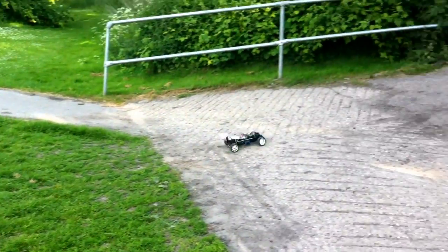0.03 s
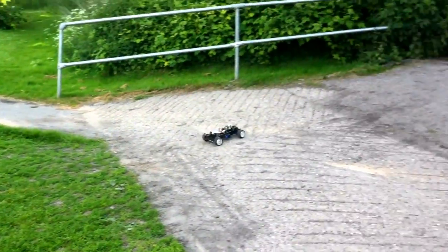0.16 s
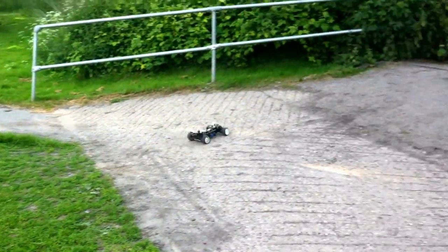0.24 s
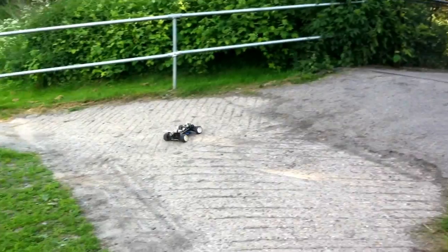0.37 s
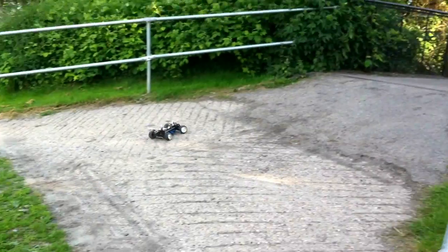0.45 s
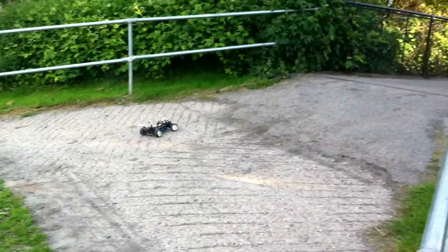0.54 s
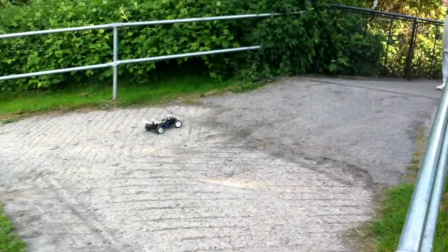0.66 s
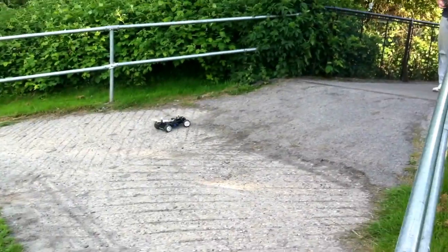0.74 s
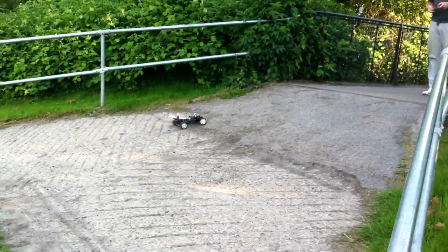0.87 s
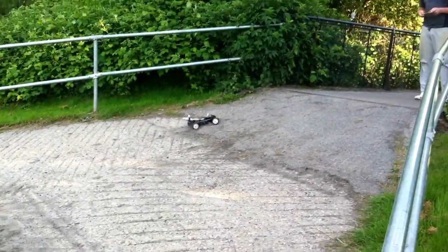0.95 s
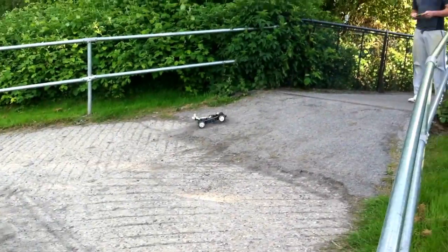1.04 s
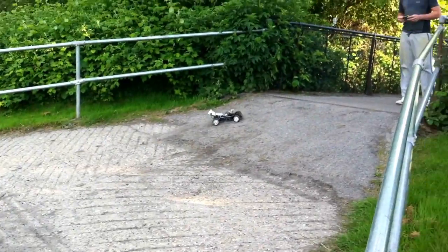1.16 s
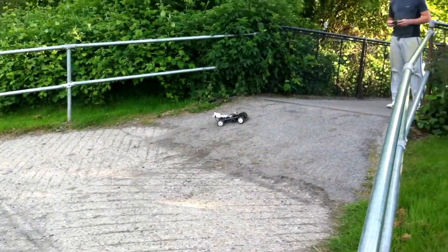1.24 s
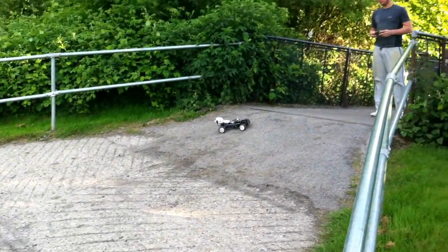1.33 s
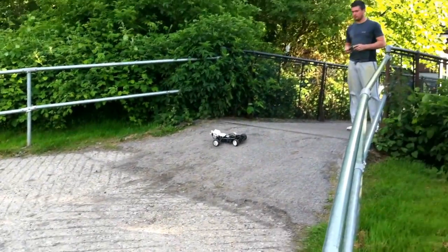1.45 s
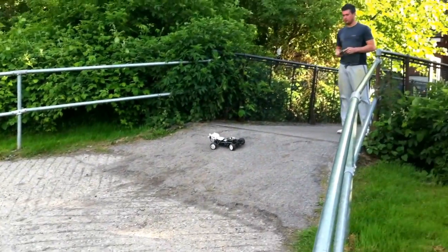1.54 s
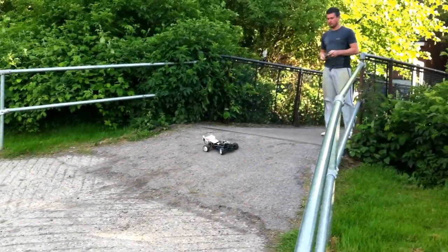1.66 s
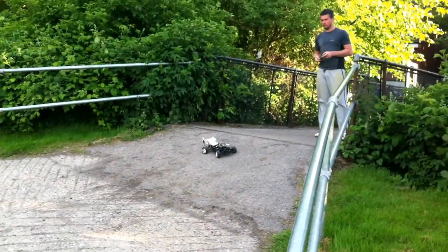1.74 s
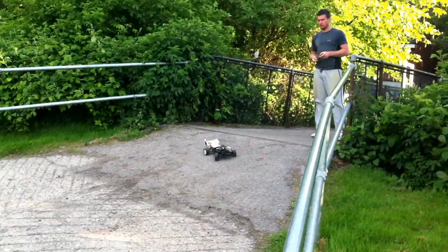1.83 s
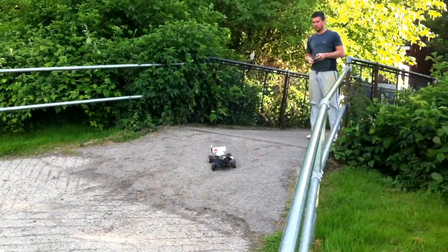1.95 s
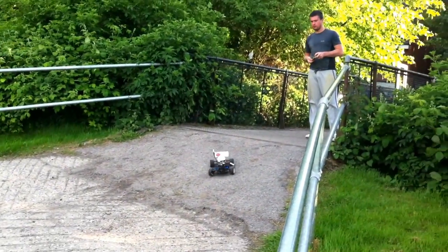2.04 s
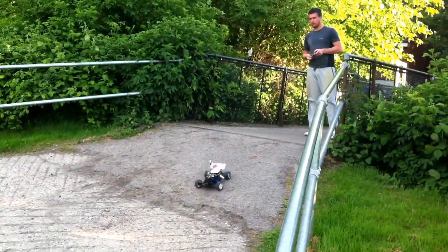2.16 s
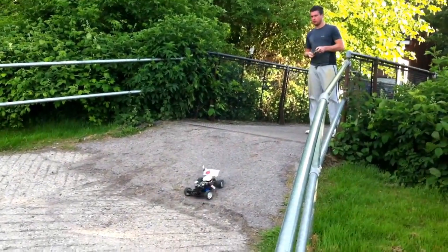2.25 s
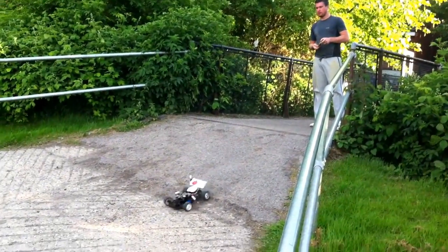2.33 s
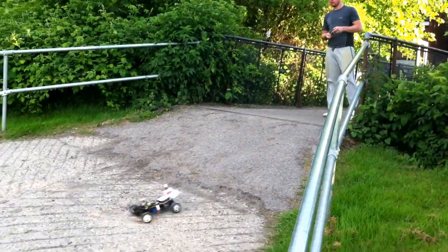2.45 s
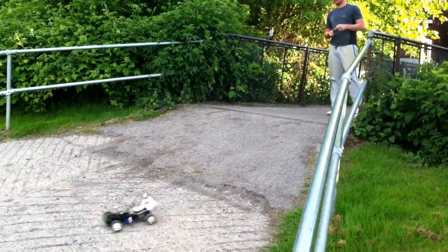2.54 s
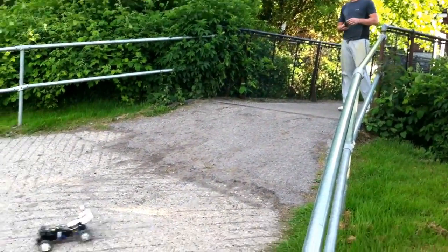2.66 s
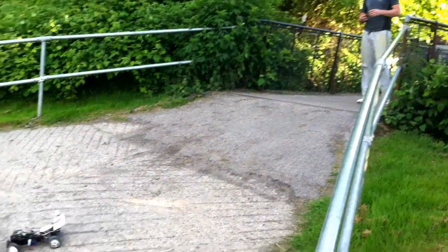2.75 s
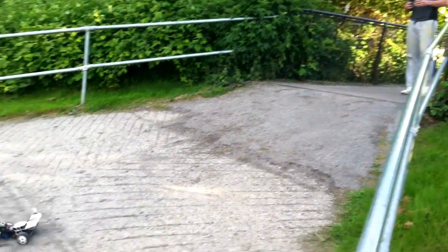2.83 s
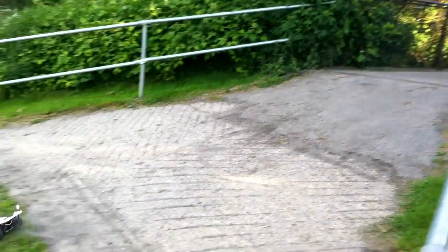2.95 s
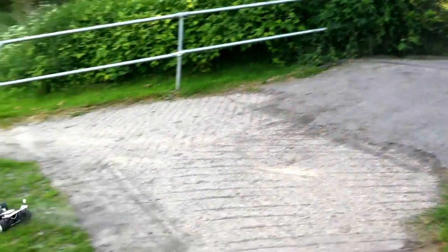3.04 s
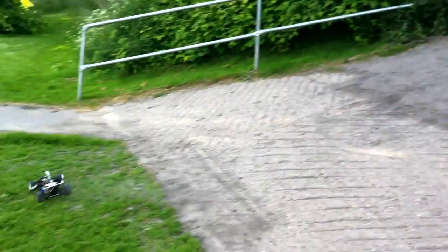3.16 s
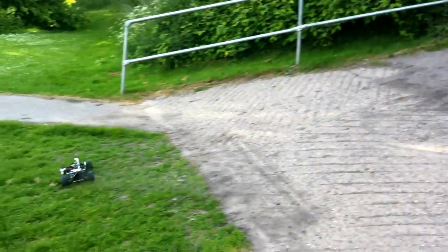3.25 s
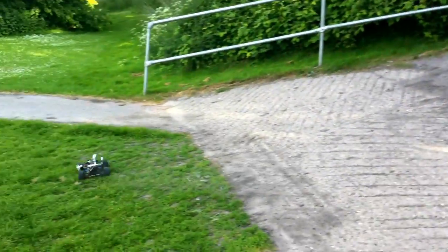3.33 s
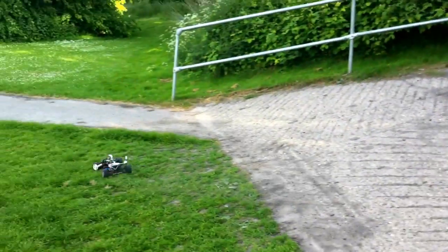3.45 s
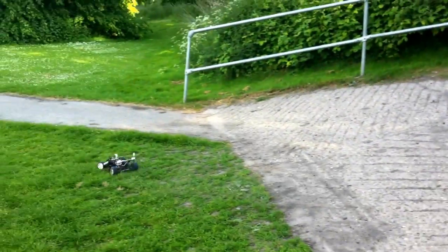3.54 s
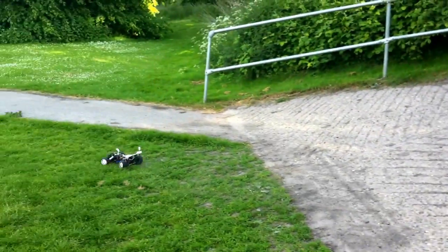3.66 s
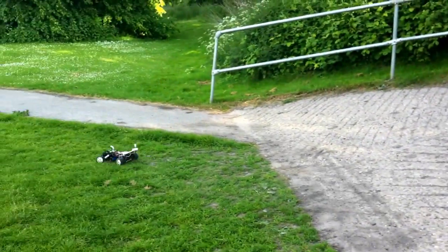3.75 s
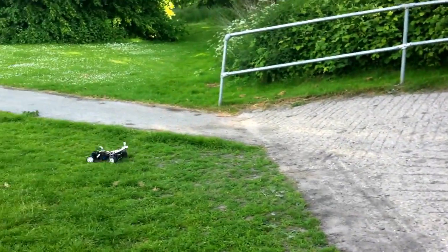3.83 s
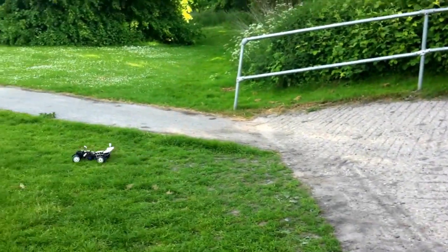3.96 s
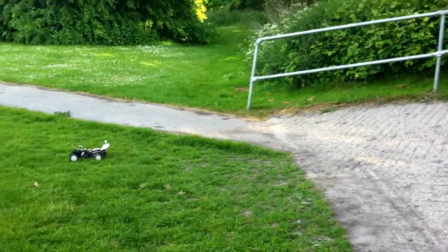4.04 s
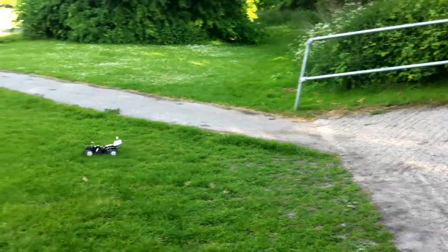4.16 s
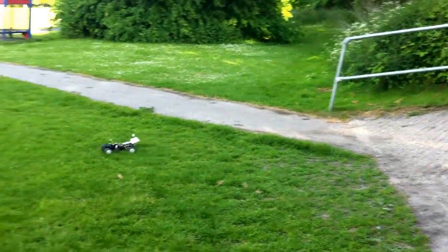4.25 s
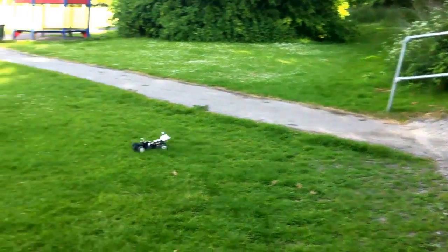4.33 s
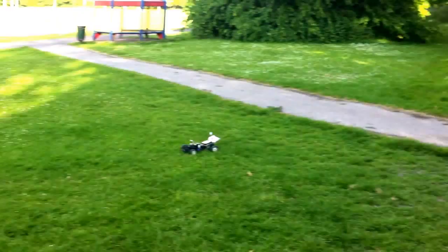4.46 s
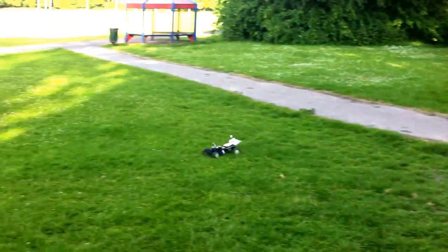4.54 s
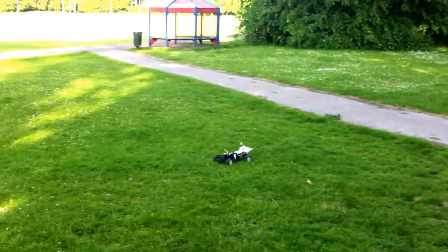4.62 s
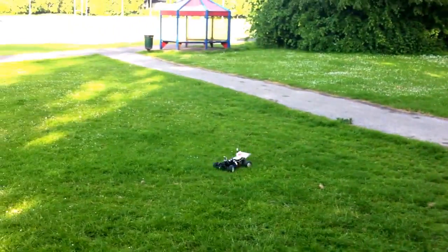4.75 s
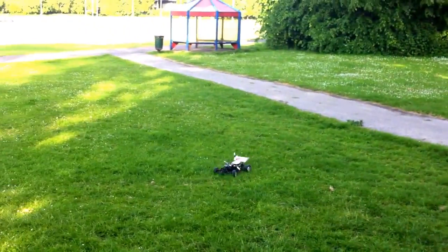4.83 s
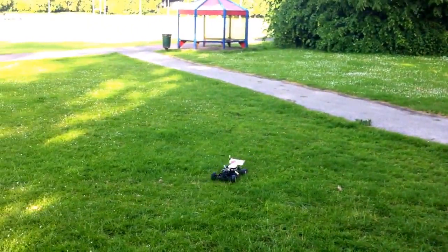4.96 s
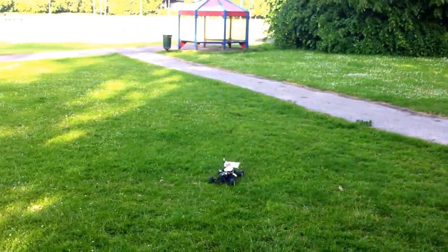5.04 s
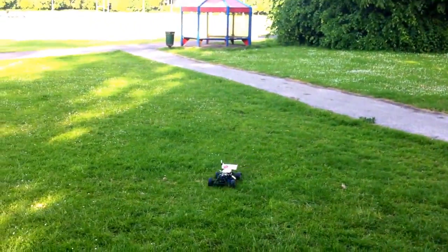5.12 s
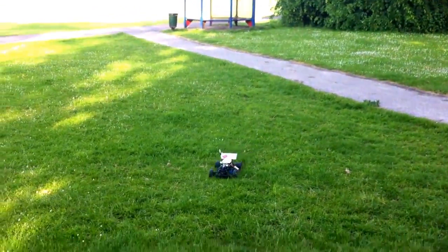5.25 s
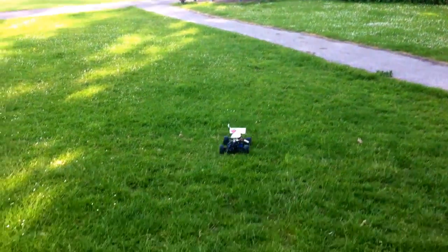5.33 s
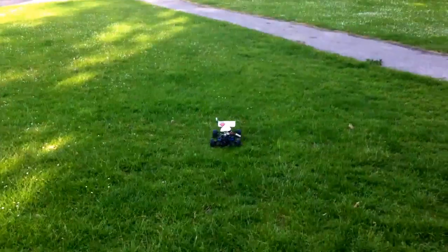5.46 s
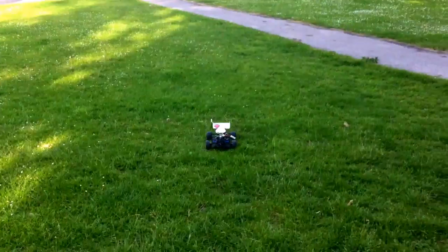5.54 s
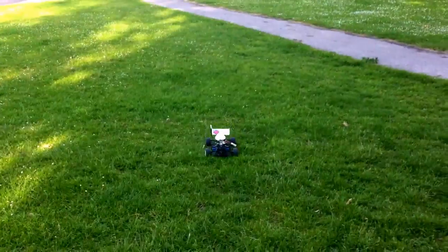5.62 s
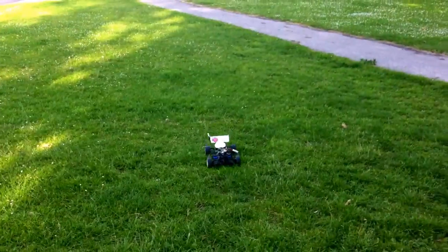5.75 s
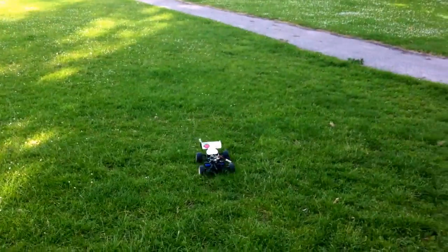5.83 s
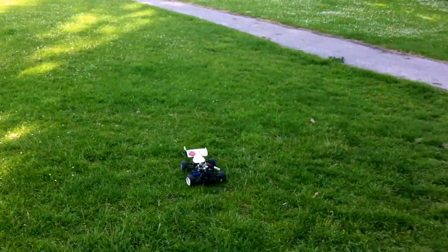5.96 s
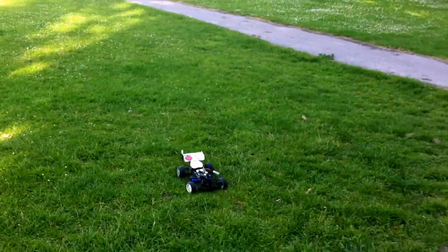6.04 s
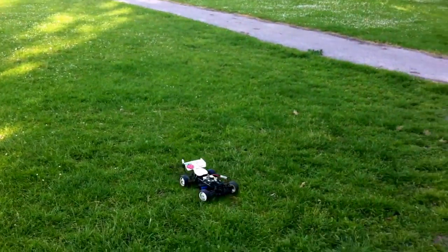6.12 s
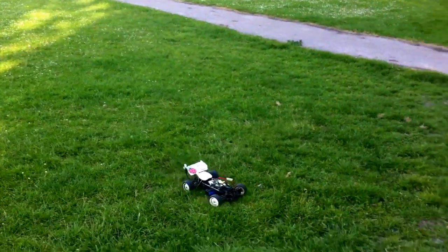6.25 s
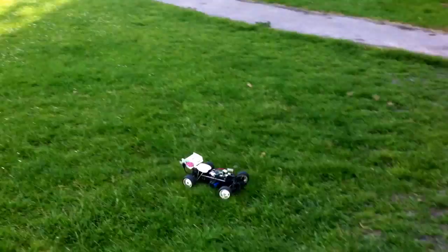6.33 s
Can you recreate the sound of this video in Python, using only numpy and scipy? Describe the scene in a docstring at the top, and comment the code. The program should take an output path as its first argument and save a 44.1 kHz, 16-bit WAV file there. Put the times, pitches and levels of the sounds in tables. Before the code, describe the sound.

Outdoors in a park, a small electric toy buggy whines with raspy plastic gears, climbing in pitch over paving, dropping as it coasts and turns, then surging to a shrill pass close by. It clatters onto grass, slackens, revs again with two soft knocks, and settles into a low labouring buzz. A handheld microphone a few metres away catches faint park hum and late wind thumps.

```python
"""The whine and rasp of a radio-controlled toy buggy come first, rising and falling with motor speed.
It darts over paving, turns, races past and labours away through grass; gears are phase-summed tones and noise.
Slack gears chirp while it coasts, tyres scrub, the chassis hops and knocks, gears clash and grit flicks the shell.
Knocks are decaying modes, the rest of the impacts shaped noise; the ground reflects them only for drive and tyres.
Low hum and outdoor rush, tones and filtered noise, lie below; wind buffets the microphone, most near the end."""
import sys
import numpy as np
from scipy import signal
from scipy.fft import rfft, irfft, next_fast_len
from scipy.io import wavfile
from scipy.ndimage import uniform_filter1d, map_coordinates

SR = 44100
rng = np.random.default_rng(int(sys.argv[2]) if len(sys.argv) > 2 else 0)


def transcribe(signal):
    """Save signal, clipped to [-1, 1], as a 16-bit WAV file at the path in sys.argv[1]."""
    frames = np.atleast_2d(signal).T
    limited = np.clip(frames, -1, 1)
    pcm = np.round(limited * 32767).astype(np.int16)
    wavfile.write(sys.argv[1], SR, pcm)


N = 281799

# Motor speed before slip. Each row: time in seconds, rate of tooth meshing in Hz.
TOOTH_RATE = [(0.0, 1410), (0.18, 1391), (0.24, 1200), (0.28, 1310), (0.38, 1159), (0.45, 1150),
              (0.5, 1290), (0.57, 1312), (0.65, 1984), (0.75, 2107), (0.8, 2215), (0.84, 2170), (0.9, 2365),
              (0.925, 2200), (1.01, 2520), (1.08, 2386), (1.13, 2580), (1.18, 2170), (1.24, 2208),
              (1.31, 3120), (1.36, 3104), (1.385, 2193), (1.43, 1560), (1.47, 1440), (1.56, 1146),
              (1.69, 1217), (1.81, 1114), (1.85, 1229), (1.9, 1110), (1.99, 1120), (2.07, 1640),
              (2.1, 1520), (2.125, 1806), (2.16, 1960), (2.25, 2280), (2.38, 2570), (2.44, 2396),
              (2.49, 2969), (2.53, 2685), (2.59, 2820), (2.68, 3060), (2.76, 2990), (2.85, 3150),
              (2.92, 3820), (2.97, 3195), (3.01, 2240), (3.13, 1772), (3.4, 1100), (3.54, 1318),
              (3.68, 1276), (3.77, 1670), (3.83, 2076), (3.91, 1698), (4.01, 2600), (4.06, 2236),
              (4.11, 2168), (4.15, 2396), (4.21, 2480), (4.26, 2336), (4.43, 2600), (4.465, 2350),
              (4.48, 2030), (4.507, 2000), (4.52, 1550), (4.57, 1300), (4.66, 1390), (4.73, 1320),
              (4.78, 1447), (4.84, 1298), (4.96, 1195), (5.04, 1365), (5.07, 1148), (5.32, 1023),
              (5.39, 1076), (5.48, 969), (5.58, 1192), (5.66, 1109), (5.77, 1221), (5.86, 1215),
              (5.94, 1421), (6.0, 1391), (6.1, 1640), (6.18, 1662), (6.26, 1293), (6.39, 1663)]
VERGE_S = 0.048  # softness in seconds of the edges of lawn and bumpy stretches


def amp(db):
    """Level law: decibels to an amplitude ratio."""
    return 10 ** (np.asarray(db) / 20)


def unit(x):
    """Normalisation of power: scale to rms 1."""
    return x / np.sqrt(np.mean(x ** 2) + 1e-20)


def along(points, hz):
    """Interpolation of (Hz, value) points on a logarithmic frequency axis."""
    f, v = np.transpose(points)
    return np.interp(np.log(hz + 1), np.log(f + 1), v)


def curves(rows):
    """Linear interpolation in time: one value per sample for each column after the time."""
    s, *cols = np.transpose(rows)
    return [np.interp(np.arange(N) / SR, s, c) for c in cols]


def gate(start, end, edge_s):
    """Smooth switching: 1 between two times and 0 outside, with soft edges."""
    t = np.arange(N) / SR
    return .5 * (np.tanh((t - start) / edge_s) - np.tanh((t - end) / edge_s))


def wobble(rate):
    """Band-limited random modulation: a smooth curve through rate random knots a second."""
    knots = rng.standard_normal(16384)
    return map_coordinates(knots, [np.arange(N) * rate / SR], mode="wrap")


def filtered(x, response):
    """Linear filtering: multiply the spectrum of x by a response of frequency."""
    m = next_fast_len(N + SR // 2)
    return irfft(rfft(x, m) * response(np.fft.rfftfreq(m, 1 / SR)), m)[:N]


def coloured(x, spectrum):
    """Spectral shaping: x through a (Hz, dB) response, at rms 1."""
    return unit(filtered(x, lambda hz: amp(along(spectrum, hz))))


def grit(spectrum, spiky_db):
    """Superposition of dense tiny impacts: noise of uneven strength, coloured, at rms 1."""
    impacts = rng.standard_normal(N) * amp(spiky_db * wobble(1500))
    return coloured(impacts, spectrum)


def drivetrain():
    """Gear meshing gives tones at multiples of the tooth rate, with rasp and sizzle; slip and load modulate them."""
    # Level laws: base dB at cruise and reference distance, dB per doubling of speed, dB coasting,
    # dB on grass, dB on the gear side, dB accelerating hard. Swells and offsets are added later.
    whine_law, octave_law, buzz_law = (-42.5, 7.5, -15.5, -1.5, 2, 0), (-37, 5.5, -13, -1.5, 1, -1.5), (-38, 7, -11.5, -0.5, 2.5, 3.5)
    rasp_law, sizzle_law = (-42.5, 8, -14.5, -4, 0.5, 0.5), (-41, 13, -8.5, 0.5, -5, 3.5)
    # Slow swells about the laws. Each row: time in seconds, tooth rasp in dB, motor sizzle in dB.
    noise_swells = [(0, 1, -15), (.75, -1.5, 0), (1.3, -1, -15), (1.5, 4.5, -9), (1.58, 11, -4),
                    (1.64, 4.5, -8), (1.75, 1, -7), (1.81, 6, -5), (1.86, 0, -7), (1.95, 2, -6),
                    (2.5, 1.5, -2), (2.8, -1, -1), (2.9, -10, -4), (2.96, -22, -5), (3.03, -15, -4),
                    (3.2, -12, 3), (3.4, 0, 5), (3.55, -1.5, 6), (3.82, 3, 3), (4.12, -3.5, 5.5),
                    (4.28, -7, -1.5), (4.5, 2.5, 1.5), (4.56, 1.5, 2), (4.7, 7.5, 1), (5.1, 4.5, -3.5),
                    (5.7, -1.5, -10), (5.95, 2.5, -6), (6.39, 5, 4.5)]
    # Slow swells about the laws. Each row: time in seconds, tooth tone in dB, overtones in dB.
    tone_swells = [(0, 5.5, -4), (.22, 2, -3), (.29, 4.5, 1), (.42, 2.5, -1.5), (.58, -1.5, -8),
                   (.615, 12, 0), (.645, 1, 3), (.72, 4, -1.5), (.9, 2, 2), (1.05, 2.5, 1.5),
                   (1.15, 2.5, -3.5), (1.21, 3, -9), (1.28, -0.5, -12), (1.4, 0, -5), (1.435, 12, -6),
                   (1.47, 8, -3), (1.6, -13, -2), (1.87, -9, -14), (1.92, 1, -3.5), (1.99, 7.5, -0.5),
                   (2.04, 5, -7), (2.08, 11.5, -5), (2.13, 10, -3), (2.17, 3.5, -2), (2.35, 3, 0.5),
                   (2.55, 2, -2.5), (2.77, 2.5, -2), (2.85, 3.5, -2), (2.91, -8, -20), (2.99, -12, -22),
                   (3.15, -0.5, -8), (3.3, 0, -12), (3.43, 9, -2), (3.49, 0.5, -3), (3.62, 4, -2),
                   (3.8, -0.5, -2), (4.0, 1, 2.5), (4.12, -3, 1), (4.3, -4.5, -4.5), (4.42, -3, -1.5),
                   (4.48, 2, 1), (4.51, 5, -3), (4.535, -17, -8), (4.565, 7, -8), (4.6, -2, -7),
                   (4.7, 5, 0), (4.88, 2, -1.5), (5.02, 3, -2.5), (5.35, -8, 1), (5.6, -2, -2.5),
                   (5.85, -8.5, -3.5), (5.95, 6, -4.5), (6.39, 3, -5)]
    # Radiation of the octave by the housing. Each row: frequency in Hz, gain in dB.
    housing = [(2000, -9), (2350, -7), (2800, -13.5), (3300, -8.5), (3750, -5.5), (4200, -2), (4800, 1),
               (5500, -5), (7000, -3)]
    # Escape of the higher overtones from the housing. Each row: frequency in Hz, gain in dB.
    overtone_path = [(2900, 0), (3450, -4), (4000, 0), (4700, 0), (5400, -10), (7500, -13), (9300, -3),
                     (11000, -20)]
    # Noise spectra, relative. Each row: frequency in Hz, level in dB per Hz.
    rasp_spectrum, sizzle_spectrum = [(300, -45), (800, -8), (1400, 7), (2200, -1.5), (3200, 1.5),
                                      (4400, -2.5), (5000, -1), (5600, 8), (6600, 3.5), (8200, -2),
                                      (9500, 2.5), (10500, 2.5), (12000, -3), (15500, -3.5)], [(8000, -87), (10800, 1.5), (12000, 10), (13200, 6.5),
                                                    (14500, 2), (15800, -8)]
    shudder_hz, shudder_db, shudder_slip = 46.2, 1, 0.035  # centre rate, swing of level, of speed (share)
    rock_per_s, rock_db, overtone_rock_db = 13, 1, 2.5  # body rocking: knots a second, swings in dB
    grip_slip, grip_db, load_sag = .037, 3.0, 0.01146  # speed swing (share), level swing, speed sag (share)
    bump_smear, bump_rattle_db = 2.0, 1  # extra phase scatter (ratio) and rattle over bumps
    air_whine_share = .5  # extra drop of the tones in the air, as a share of the drop in drive level

    tooth_hz, = curves(TOOTH_RATE)
    rasp_swell_db, sizzle_swell_db = curves(noise_swells)
    whine_swell_db, overtone_swell_db = curves(tone_swells)
    whine_db, octave_db, buzz_db, rasp_db, sizzle_db = levels(
        whine_law, octave_law, buzz_law, rasp_law, sizzle_law)
    load, bumps = jostle(hz=55.2), bumpiness()
    shake = bumps * jostle(hz=shudder_hz)
    jump, grip, contact = stick_slip()
    hop_db = hops()
    # in the air the tones die away further than the rasp
    contact = contact * amp(air_whine_share * np.minimum(hop_db, 0))
    # backlash: the teeth run ahead when slack and are held back when they bite
    play = np.interp(tooth_hz, [1000, 2100, 3000], [.5, 1, .7])
    slip = shudder_slip * shake - load_sag * load + grip_slip * jump + .009 * wobble(400)
    tooth_hz = tooth_hz * (1 + play * slip)
    phase = 2 * np.pi * np.cumsum(tooth_hz) / SR
    # a slightly eccentric 13-tooth pinion presses harder once a turn
    pinion = np.sin(phase / 13)
    # slow teeth mesh less evenly
    crawl = np.interp(tooth_hz, [1300, 2000], [1.25, 1])

    def tone(order, smear, burst_db):
        """Phase and amplitude modulation: a multiple of the tooth rate in bursts, rougher over bumps."""
        catch = np.tanh(jostle(hz=50) + .5 * load - .4 * jump)
        scatter = smear * (crawl + bump_smear * bumps) * wobble(450)
        swing_db = burst_db * catch + grip_db * grip / order + 1.1 * pinion
        return unit(np.sin(order * phase + scatter) * contact * amp(swing_db))

    low = tone(order=1, smear=.4, burst_db=3.6)
    high = tone(order=2, smear=.62, burst_db=3.8)
    whine_db = whine_db + whine_swell_db + rock_db * wobble(rock_per_s)
    octave_db = octave_db + overtone_swell_db + along(housing, 2 * tooth_hz)
    octave_db = octave_db + overtone_rock_db * wobble(rock_per_s)
    whine = amp(whine_db) * low + amp(octave_db) * high

    # higher overtones and rattle stand out where they cross the resonances of the gear case
    chatter = unit(amp(1.13 * load + .8 * pinion + 0.37 * np.cos(phase)))
    third = tone(order=3, smear=.75, burst_db=4.5)
    fourth = tone(order=4, smear=1.2, burst_db=3)
    overtones = filtered(third + amp(-5) * fourth, lambda hz: amp(along(overtone_path, hz)))
    rattle = amp(10.5 + bump_rattle_db * bumps) * chatter * rng.standard_normal(N)
    overtone_db = rasp_db + overtone_swell_db + 7.5 + overtone_rock_db * wobble(rock_per_s)
    buzz = filtered(amp(overtone_db) * overtones + amp(buzz_db - 5.0) * rattle, gearbox)

    rasp = amp(rasp_db + rasp_swell_db + 3.5) * grit(rasp_spectrum, spiky_db=2.0)
    sizzle_db = sizzle_db + sizzle_swell_db - 4.0 + 0.88 * wobble(82)
    sizzle = amp(sizzle_db) * grit(sizzle_spectrum, spiky_db=2.0)
    return amp(hop_db + shudder_db * shake) * (whine + buzz + chatter * (rasp + sizzle))


def levels(*laws):
    """Power laws of speed and inverse distance: dB over time, with throttle, surface, heading and surge."""
    # The course. Each row: time in seconds, distance in metres (sign ignored), side turned to the
    # microphone (towards 1 the gear side, towards -1 the motor side).
    course = [(0, 3.8, -0.041), (.5, 3.25, 1), (.72, 3.63, 0.68), (1.2, 4.38, -0.75), (1.7, 8.3, -0.55),
              (2.05, 5.9, 1), (2.35, 4.17, -0.52), (2.8, 3, -1.57), (3.15, 2.2, -0.055), (3.6, 3.77, 0.045),
              (4.1, 3.8, 0.11), (4.75, 4.34, -1.05), (5.35, 4.55, -1.05), (5.8, 2.64, -0.92),
              (6.05, 3.47, 0.59), (6.39, 3.56, 0.32)]
    # Throttle released. Each row: start in seconds, end in seconds, share released from 0 to 1.
    coasts = [(1.475, 1.9, 0.83), (3.019, 3.467, 0.84)]
    throttle_s, grass_from_s = 0.0029, 3.032  # softness of throttle edges, reaching the lawn
    cruise_hz, reference_m = 2000, 4
    surge_per_s, surge_window_s = 8.1, 0.12  # scale of hard acceleration (doublings a second), averaging time

    tooth_hz, = curves(TOOTH_RATE)
    distance_m, side = curves(course)
    coasting = sum(share * gate(start, end, throttle_s) for start, end, share in coasts)
    grass = gate(grass_from_s, np.inf, VERGE_S)
    doublings = np.log2(tooth_hz / cruise_hz)
    acceleration = uniform_filter1d(np.gradient(doublings) * SR, int(surge_window_s * SR))
    surge = np.tanh(acceleration / surge_per_s)
    spread_db = 20 * np.log10(np.abs(distance_m) / reference_m)
    out = []
    for db, speed_db, coast_db, grass_db, side_db, surge_db in laws:
        motion_db = speed_db * doublings + coast_db * coasting + surge_db * surge
        out.append(db + motion_db + grass_db * grass + side_db * side - spread_db)
    return out


def jostle(hz):
    """Random vibration on springs: band-shaped noise around hz, limited, at rms 1."""
    shake = filtered(rng.standard_normal(N), lambda f: f * f / (1 + (f / hz) ** 4) / (1 + f / hz))
    return unit(np.tanh(unit(shake)))


def bumpiness():
    """Forced excitation by the ground: how hard it shakes the chassis, over time."""
    # Bumpy stretches. Each row: start in seconds, end in seconds, strength from 0 to 1.
    stretches = [(1.31, 1.463, 1), (2.806, 3.256, 0.86), (4.039, 4.603, 0.45)]
    return sum(share * gate(start, end, VERGE_S) for start, end, share in stretches)


def stick_slip():
    """Stick-slip friction: spells of grip, each with its own speed and load, slackening the mesh between."""
    grip_s = .016  # typical length of a spell
    spell_glide = 1.1  # rise of speed within a spell, relative to the steps between spells
    spells = rng.standard_normal((1200, 3))
    ends = np.cumsum(np.exp(.45 * spells[:, 0])) * grip_s
    place = np.interp(np.arange(N) / SR, ends - ends[0], np.arange(len(ends)))
    speed, load = np.tanh(spells[place.astype(int), 1:].T)
    speed = speed + spell_glide * (place % 1 - .5)
    speed, load = uniform_filter1d([speed, load], size=90, axis=1)
    contact = np.abs(np.sin(np.pi * place)) ** .7
    return unit(speed), unit(load), unit(contact)


def hops():
    """Loss and return of load: drive level in dB falls in the air and overshoots as the wheels bite."""
    # Skips. Each row: landing in seconds, time in the air in seconds, drop in drive level in dB.
    skips = [(1.075, 0.015, 1.5), (1.296, 0.018, 5), (1.365, 0.0085, 9), (1.905, 0.02, 1),
             (2.626, 0.013, 2.5), (2.738, 0.018, 3.5), (2.756, 0.011, 1.5), (2.803, 0.0063, 0),
             (2.846, 0.0045, 2), (2.877, 0.016, 7), (2.903, 0.016, 6.5), (2.941, 0.01, 6),
             (2.956, 0.0063, 6), (2.996, 0.023, 7), (3.018, 0.007, 4), (3.059, 0.027, 1), (3.092, 0.024, 3),
             (3.132, 0.028, 2), (3.472, 0.12, 1), (4.456, 0.0077, 6), (4.471, 0.006, 6),
             (4.504, 0.018, 11.5), (4.526, 0.0097, 7), (4.562, 0.02, 6), (4.606, 0.03, 4.5),
             (4.635, 0.016, 4)]
    bite_share, bite_s, edge_s = 0.31, 0.013, 0.00067  # overshoot (share of drop), its length, edge softness
    out = 0
    for s, air_s, db in skips:
        bite = bite_share * gate(s, s + bite_s, edge_s)
        out = out + db * (bite - gate(s - air_s, s, edge_s))
    return out


def gearbox(hz):
    """Modal superposition: resonances of the plastic gear case, summed with alternating sign."""
    # Each row: resonance in Hz, width in Hz, peak gain of the mode in dB.
    modes = [(2210, 256, -2), (3070, 460, -8), (3780, 540, -5), (4210, 118, 4), (4570, 680, 1),
             (5780, 1800, -3.5), (9400, 130, -9)]
    response = 0
    for k, (centre, width, db) in enumerate(modes):
        mode = 1j * hz * width / (centre * centre - hz * hz + 1j * hz * width)
        response = response + amp(db) * mode * (-1) ** k
    return response


def case_ring(width_hz, reach_hz):
    """Resonant excitation: a narrow ring of the gear case, strongest when a tooth overtone comes near it."""
    # Each row: time in seconds, pitch in Hz, swell about the level law in dB.
    ring_course = [(0, 4290, 2), (.18, 4290, 4), (.3, 4310, 0), (1.1, 4330, -2), (1.19, 4220, 3),
                   (1.235, 4280, 8), (1.28, 4250, 3), (1.45, 4290, 6), (2.05, 4400, 5), (2.4, 4330, -1),
                   (4.4, 4210, 5), (4.57, 4197, -7), (4.68, 4220, 7), (4.9, 4210, 0), (5.1, 4110, 9),
                   (5.3, 4005, 17.5), (5.8, 4010, -3), (6.1, 4463, -9)]
    # Level law, columns as in drivetrain().
    ring_law = (-49.5, 3, -22, -6, -4, 13)
    tooth_hz, = curves(TOOTH_RATE)
    hz, swell_db = curves(ring_course)
    ring_db, = levels(ring_law)
    near = sum(1 / np.hypot(1, (order * tooth_hz - hz) / reach_hz) for order in range(2, 4))
    phase = 2 * np.pi * np.cumsum(hz) / SR

    def flutter():
        """Low-pass noise: a slow random envelope that broadens the ring."""
        return filtered(rng.standard_normal(N), lambda f: 1 / (1 + (f / width_hz) ** 2))

    ring = unit(flutter() * np.cos(phase) + flutter() * np.sin(phase))
    return amp(ring_db + swell_db) * near * ring


def tyres():
    """Friction noise: rubber studs scrub over the ground."""
    # Level law, columns as in drivetrain().
    scrub_law = (-48.5, 3.5, -2.5, -8, -2, -3)
    # Relative spectrum. Each row: frequency in Hz, level in dB per Hz.
    scrub_spectrum = [(60, -9), (150, -5), (300, -4), (700, 7), (1500, 2), (3000, -4.5), (8000, -23)]
    scrub_db, = levels(scrub_law)
    scrub_db = scrub_db + 4.0 + 2.46 * wobble(70) + 1.56 * wobble(12)
    return amp(scrub_db) * grit(scrub_spectrum, spiky_db=1.5)


def ground_bounce(x):
    """Comb interference: an inverted, delayed reflection cuts notches that move over time."""
    # Each row: time in seconds, first frequency cancelled in Hz, reflected share from 0 to 1.
    bounce = [(0, 5170, 0.57), (.8, 5460, 0.52), (1.4, 5310, 0.47), (2.2, 5360, 0.67), (2.7, 5730, 0.72),
              (3.2, 5970, 0.65), (3.7, 5630, 0.52), (4.2, 5700, 0.6), (4.5, 5420, 0.45), (4.75, 5175, 0.2),
              (5.2, 5226, 0.8), (6.39, 5370, 0.66)]
    notch_hz, share = curves(bounce)
    reflection = map_coordinates(x, [np.arange(N) - SR / notch_hz])
    return x - np.clip(share, 0, 1) * reflection


def chirps():
    """Frequency modulation: slack gears catch while coasting and sing a short rough rising note."""
    # Each row: centre in seconds, pitch in Hz, standard deviation of the bell envelope in seconds,
    # rms level at the peak in dB, phase roughness in radians.
    notes = [(1.58, 2310, .014, -53, .6), (1.687, 1700, 0.011, -48, 0.27), (1.805, 3750, 0.019, -62, 0.55),
             (1.804, 1430, 0.012, -53, 0.83), (3.026, 2253, 0.013, -42, 0.54),
             (3.19, 4740, 0.007, -42.5, 1.23), (3.243, 1460, 0.0047, -41, 0.55),
             (3.279, 2760, 0.004, -43.5, .8), (3.302, 1270, .005, -43.5, 0.46)]
    rise_per_s = 2.2  # upward glide as a share of the pitch
    out, t = np.zeros(N), np.arange(N) / SR
    scatter = wobble(830)
    for s, hz, length, db, rough in notes:
        near = np.abs(t - s) < .1
        u = t[near] - s
        phase = 2 * np.pi * hz * (u + rise_per_s * u * u / 2) + rough * scatter[near]
        envelope = np.exp(-.5 * (u / length) ** 2)
        out[near] += amp(db) * np.sqrt(2) * envelope * np.sin(phase)
    return out


def knocks():
    """Modal impact: the chassis bottoms out in a click and short plastic ring, fuller on turf than on paving."""
    # Each row: start in seconds, peak level in dB, relative click level in dB, bass cut in Hz.
    blows = [(1.368, -9, -17.5, 1500), (4.3543, -15.5, -20, 605), (4.442, -16, -12.5, 350.4)]
    # Modes of the plastic chassis. Each row: frequency in Hz, relative level in dB, 60 dB decay in seconds.
    chassis = [(840, 3.5, 0.011), (1130, -24, 0.016), (1650, 9.5, 0.0067), (2080, -2, 0.024),
               (2980, 1, 0.015), (6380, 3, 0.0093), (7670, 5, 0.0078)]
    out, t = np.zeros(N + SR), np.arange(SR // 10) / SR
    for s, db, click_db, cut_hz in blows:
        ring = 0
        for hz, level, t60 in chassis:
            decay = amp(level + rng.normal() - 60 * t / t60)
            ring = ring + decay * np.sin(2 * np.pi * (hz * t + rng.random()))
        click = amp(click_db + 23.5 - 60 * t / 0.0092) * rng.standard_normal(len(t))
        knock = (ring + click) * (1 - np.exp(-t / .0005))
        knock = signal.lfilter(*signal.butter(2, cut_hz, "high", fs=SR), knock)
        out[round(s * SR):][:len(t)] += amp(db) * knock / np.abs(knock).max()
    return out[:N]


def clashes():
    """Band-limited impact noise: gears clash in coarse bursts around one pitch as the wheels slam down."""
    # Each row: start in seconds, length in seconds, pitch in Hz, rms level over that length in dB.
    bursts = [(2.737, 0.0076, 2900, -28), (2.841, 0.012, 3660, -29), (2.879, 0.01, 3520, -28),
              (2.898, 0.0072, 3400, -31), (2.912, .018, 3700, -29), (2.94, 0.0052, 3500, -32),
              (2.958, .009, 3170, -34), (2.967, .007, 2800, -30), (2.996, 0.011, 1620, -38),
              (3.015, .007, 2400, -41), (3.058, .006, 4300, -39.5), (3.09, .007, 4400, -43),
              (3.133, .005, 4870, -44), (3.150, .006, 3880, -41), (3.359, 0.0072, 3500, -47),
              (4.503, 0.0076, 4270, -35.5)]
    out, t = np.zeros(N + SR), np.arange(SR // 16) / SR
    ratio = 1.15  # band edges above and below the pitch
    for s, length, hz, db in bursts:
        teeth = rng.standard_normal(len(t)) * amp(3 * rng.standard_normal(len(t)))
        band = signal.butter(2, [hz / ratio, hz * ratio], "band", fs=SR)
        rattle = signal.lfilter(*band, teeth * (t < length))
        rms = np.sqrt(np.sum(rattle ** 2) / (length * SR))
        out[round(s * SR):][:len(t)] += amp(db) * rattle / rms
    return out[:N]


def flicks():
    """Exponential decay after impact: grit and stalks tick thin and bright off the body shell."""
    # Each row: start in seconds, initial level in dB.
    ticks = [(1.879, -53), (2.942, -19.5), (2.998, -31), (3.005, -27), (3.019, -36), (3.082, -36),
             (3.135, -42), (3.181, -37), (3.284, -40), (3.422, -42), (4.355, -23), (4.525, -33),
             (4.539, -32), (4.561, -33), (4.584, -37), (4.606, -42)]
    # Relative spectrum of the shell. Each row: frequency in Hz, level in dB per Hz.
    shell = [(1000, -30), (4000, -21), (7000, -11), (10500, -20), (12500, 3), (14500, 2), (15800, -9)]
    fade_s = 0.0032  # time to fade to 1/e
    strength, t = np.zeros(N + SR), np.arange(SR // 20) / SR
    for s, db in ticks:
        strength[round(s * SR):][:len(t)] += amp(db) * np.exp(-t / fade_s)
    return strength[:N] * grit(shell, spiky_db=1.5)


def surroundings(x, t60):
    """Diffuse scattering: hedges and railings return a short tail, by convolution with decaying noise."""
    t = np.arange(SR // 3) / SR
    tail = rng.standard_normal(len(t)) * amp(-60 * t / t60) * (1 - np.exp(-t / 0.00083))
    return signal.fftconvolve(x, tail / np.linalg.norm(tail))[:N]


def wind():
    """Turbulent pressure: eddies thump on the microphone port, brief gusts over a light breeze."""
    # Each row: peak time in seconds, peak level in dB, standard deviation of the bell envelope in seconds.
    gust_rows = [(0.333, -37.5, 0.008), (0.42, -48.5, 0.091), (1.453, -47, 0.012), (2.24, -45.5, 0.016),
                 (2.359, -46.5, 0.0088), (3.292, -46.5, 0.011), (5, -41, 0.0087), (5.266, -40, 0.03),
                 (5.366, -34.5, 0.018), (5.434, -30, 0.012), (5.481, -34, 0.0086), (5.534, -35.5, 0.03),
                 (5.648, -40, 0.025), (5.759, -36, 0.02), (5.925, -38, 0.044), (6, -52, 0.037),
                 (6.098, -29.5, 0.035), (6.138, -28.5, 0.0089), (6.247, -32.5, 0.023),
                 (6.296, -36.5, 0.015), (6.385, -32, 0.029)]
    # Relative spectrum. Each row: frequency in Hz, level in dB per Hz.
    buffet_spectrum = [(25, -45), (60, -20.5), (105, -10), (160, -1.5), (240, -5.5), (330, -12.5),
                       (500, -22.5), (1000, -38), (3000, -53)]
    breeze_db, breeze_swing_db = -58.5, 1
    t = np.arange(N) / SR
    gusts = sum(amp(db) * np.exp(-.5 * ((t - s) / length) ** 2) for s, db, length in gust_rows)
    strength = np.hypot(gusts, amp(breeze_db + breeze_swing_db * wobble(14)))
    buffet = coloured(rng.standard_normal(N), buffet_spectrum)
    return strength * unit(amp(1.8 * np.tanh(wobble(45))) * buffet)


def park():
    """Superposition of distant sources: an outdoor rush of noise with wavering low hum tones."""
    # Hum tones that come and go. Each row: start in seconds, end in seconds, pitch in Hz, level in dB.
    hum_tones = [(-3, 3.9, 140, -61.5), (-2, 0.53, 290.5, -62), (-0.5, 0.31, 360.5, -61.5),
                 (3, 11, 140, -65.5), (1.5, 1.9, 215, -59.5), (3.5, 8.7, 312, -65), (2.5, 5, 260, -79),
                 (4, 5.9, 387.6, -66)]
    # Relative spectrum of the rush. Each row: frequency in Hz, level in dB per Hz.
    rush_spectrum = [(25, -24), (95, -26), (135, 13.5), (200, -1.5), (350, 1.5), (700, 4.5), (1500, 4.5),
                     (3000, -43), (5500, -47), (15000, -18)]
    t = np.arange(N) / SR
    hum = 0
    for start, end, hz, db in hum_tones:
        waver = unit(amp(2.2 * wobble(9)) * np.sin(2 * np.pi * hz * t + .5 * wobble(7)))
        hum = hum + amp(db) * gate(start, end, edge_s=0.09) * waver
    return hum + amp(-53.5) * coloured(rng.standard_normal(N), rush_spectrum)


def scene():
    """Linear superposition: the buggy over the ground, its scattered tail, and the open air."""
    car = ground_bounce(drivetrain() + tyres())
    car = car + case_ring(width_hz=120, reach_hz=200) + chirps()
    car = car + knocks() + clashes() + flicks()
    scatter = amp(-22) * surroundings(car, t60=.25)
    return (car + scatter + park() + wind())[None]


def record(dry):
    """Band limitation: nothing at or above 15.9 kHz passes."""
    return filtered(dry[0], lambda hz: hz < 15900)[None]


dry = scene()
out = record(dry)
transcribe(out)
```